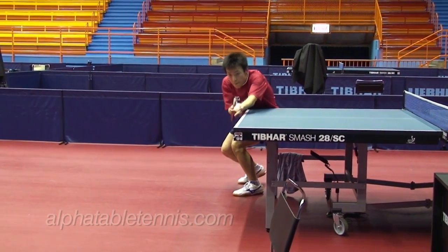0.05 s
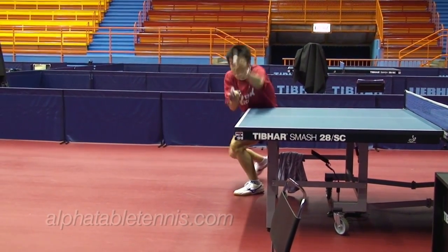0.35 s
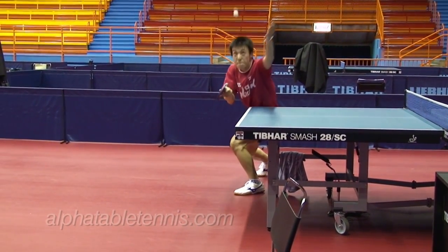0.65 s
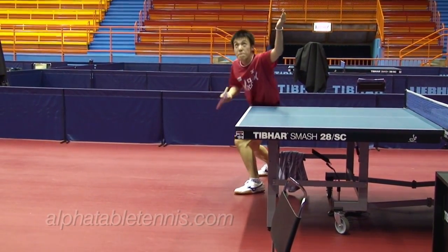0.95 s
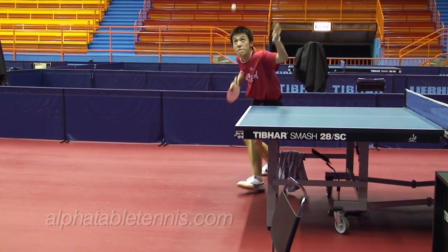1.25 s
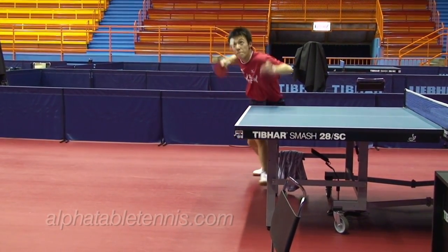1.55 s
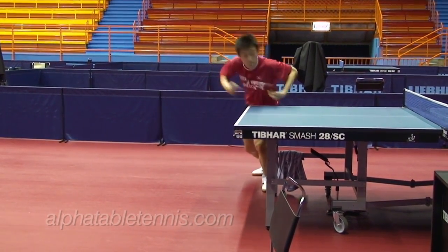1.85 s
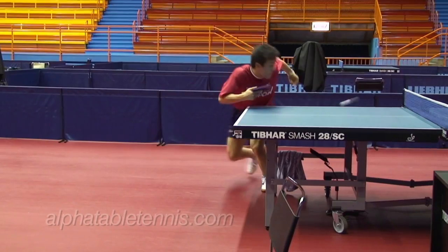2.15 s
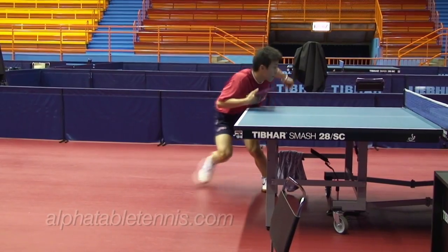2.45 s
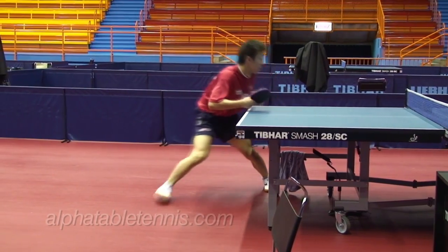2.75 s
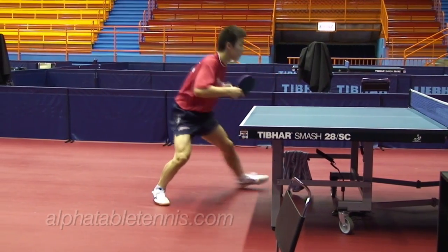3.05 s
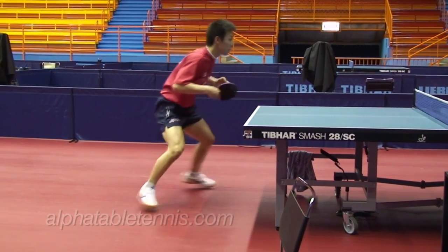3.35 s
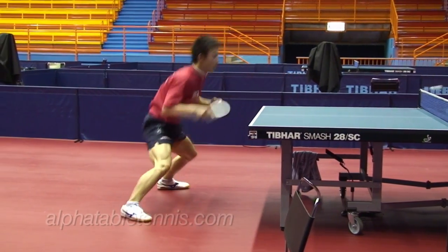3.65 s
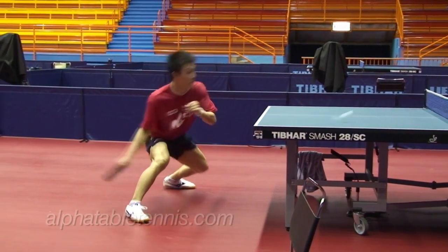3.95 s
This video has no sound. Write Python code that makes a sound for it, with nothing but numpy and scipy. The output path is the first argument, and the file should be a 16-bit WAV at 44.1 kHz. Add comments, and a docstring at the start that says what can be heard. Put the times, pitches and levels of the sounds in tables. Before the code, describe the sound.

A table tennis ball is played in a large echoing hall over a low ventilation rumble. Faint rustling and light taps come first. At 1.8 seconds the bat cracks sharply with a foot stomp, and the ball pings on the table, again at 2.2. A return cracks at 2.4, with further bounces and knocks near 2.9 and 3.3. Steps thud throughout, and a shoe squeaks around 3.7.

```python
"""A table tennis ball is served and returned in a large sports hall.
The bat cracks against it, its hollow shell pings at each bounce and the table top knocks.
The server stamps on the springy floor, clothes rustle and both players step and slide into place.
The hall echoes for seconds over the low rumble of the ventilation."""
import sys
import numpy as np
from scipy import signal
from scipy.fft import rfft, irfft
from scipy.io import wavfile
from scipy.ndimage import uniform_filter1d

SR = 44100
rng = np.random.default_rng(int(sys.argv[2]) if len(sys.argv) > 2 else 0)


def dump_mix(stems):
    """Bounce the given channels to the path in sys.argv[1] as a 16-bit WAV at rate SR."""
    frames = np.atleast_2d(stems).T  # one column per channel
    limited = np.clip(frames, -1, 1)  # hard clip at full scale
    pcm = np.round(limited * 32767).astype(np.int16)
    wavfile.write(sys.argv[1], SR, pcm)


N = 4 * SR


def amp(db):
    """Turns decibels into a number to multiply by."""
    return 10 ** (np.asarray(db) / 20)


def unit(x):
    """Scales a sound to an average strength (rms) of 1."""
    return x / np.sqrt(np.mean(x ** 2) + 1e-20)


def look_up(table, hz):
    """Reads between the rows of a frequency table, with octaves evenly spaced."""
    row_hz, values = np.transpose(table)
    return np.interp(np.log(hz + 1), np.log(row_hz + 1), values)


def add(mix, start_s, sound):
    """Mixes a sound in at the given time."""
    part = mix[max(round(start_s * SR), 0):][:len(sound)]
    part += sound[:len(part)]


def noise(colour, size):
    """Steady noise whose colour table says how strong each frequency is."""
    hz = np.fft.rfftfreq(size, 1 / SR)
    phases = np.exp(2j * np.pi * rng.random(len(hz)))
    return unit(irfft(amp(look_up(colour, hz)) * phases, size))


def snaps(size, per_s, spread_db, max_db):
    """Tiny clicks at random moments, most of them weak and a few strong."""
    strength = amp(np.minimum(spread_db * rng.exponential(1, size), max_db))
    happens = rng.random(size) < per_s / SR
    return strength * happens * rng.choice([-1, 1], size)


def ring(tones, rise_s):
    """A struck object's own tones swell, then each drops 60 dB over its ring time."""
    t = np.arange(SR // 2) / SR
    waves = sum(amp(db - 60 * t / ring_s) * np.sin(2 * np.pi * hz * t) for hz, db, ring_s in tones)
    return (1 - np.exp(-t / rise_s)) * waves


# How long the hall's echo takes to drop 60 dB (frequency [Hz], ring time [s])
HALL_RING_TIMES = [(50, 2.4), (200, 3.34), (600, 2.9), (1500, 4.85), (4000, 2.87), (8000, 0.23)]

def in_hall(direct, echo_db, gap_s=0.018, build_s=0.0041):
    """Adds the hall's wash of echoes, in which each frequency dies away at its own speed."""
    hz, t, bands = signal.stft(rng.standard_normal(SR * 5 // 2), SR, nperseg=512)
    fade = amp(-60 * t / look_up(HALL_RING_TIMES, hz)[:, None])
    tail = signal.istft(bands * fade, SR, nperseg=512)[1]
    since_gap = np.maximum(np.arange(len(tail)) / SR - gap_s, 0)
    tail *= (1 - np.exp(-since_gap / build_s)) / np.sqrt(SR / 6)
    return direct + amp(echo_db) * signal.fftconvolve(direct, tail)[:N]


# The colour of the moving air (frequency [Hz], relative level [dB])
AIR_COLOUR = [(20, -13.5), (45, -2), (62, 0.5), (85, -9), (105, -8.5), (160, -11), (230, -14), (325, -16),
              (480, -22.5), (1000, -30), (1500, -34), (2700, -41), (3400, -41), (3950, -38), (4300, -45.5),
              (4750, -43), (5600, -54.5), (7400, -55.5), (8200, -80.5), (9500, -100)]

def ventilation(level_db=-36):
    """The ventilation fills the hall with a steady rumble and a faint hiss."""
    return amp(level_db) * noise(AIR_COLOUR, N)


# How loudly shirt and shoes rustle as the ball is tossed (time [s], level [dB])
RUSTLE_LEVELS = [(.5, -70.5), (.62, -71.5), (.8, -74), (1.03, -57.5), (1.15, -54), (1.33, -52),
                 (1.45, -50.5), (1.639, -56), (1.802, -53)]
# The colour of that rustle (frequency [Hz], relative level [dB])
CLOTH_COLOUR = [(300, -16), (900, -2.5), (1850, 2), (2600, -6), (4200, -6.5), (7000, -32.5), (9000, -51.5)]

def rustle():
    """Cloth and rubber catch and let go many times a second, each time with a tiny puff of noise."""
    catches = snaps(N, per_s=1500, spread_db=2.5, max_db=10)
    puff = noise(CLOTH_COLOUR, 256) * np.hanning(256)
    puffs = unit(signal.oaconvolve(catches, puff)[:N])
    level_db = np.interp(np.arange(N) / SR, *np.transpose(RUSTLE_LEVELS), left=-100, right=-100)
    return in_hall(amp(level_db) * puffs, echo_db=-3.5)


# Soles sliding on the floor mat
# (middle time [s], half length [s], level [dB], centre frequency [Hz], width [octaves])
SOLE_SLIDES = [(0.15, 0.022, -62.5, 5200, 0.3), (0.898, 0.017, -54.5, 3270, 0.039),
               (1.251, 0.015, -52, 3900, 0.35), (1.507, 0.018, -44, 1770, .1),
               (1.631, 0.054, -48.5, 1810, .12), (1.993, .012, -48, 4780, 0.3),
               (2.3345, 0.0017, -32, 4050, 0.14), (2.339, 0.035, -55.5, 5336, 0.21),
               (3.087, 0.063, -45.5, 3995, 0.41), (3.617, 0.053, -53.5, 5610, 0.34),
               (3.668, .011, -24, 1000, .05), (3.71, .019, -26, 1015, .05), (3.917, 0.031, -50, 5320, 0.41),
               (3.936, 0.029, -39, 3310, 0.38)]

def slides(slip_s=0.006, slip_db=3.5, top_hz=7900):
    """Rubber brushes the mat, catching and slipping; a gripping sole narrows to a dull squeak."""
    out, t = np.zeros(N), np.arange(SR // 2) / SR
    hz = np.fft.rfftfreq(len(t), 1 / SR) + 1
    treble_cut = 1 / (1 + (hz / top_hz) ** 40)
    for middle_s, half_s, db, centre_hz, octaves in SOLE_SLIDES:
        slipping = unit(uniform_filter1d(rng.standard_normal(len(t)), round(slip_s * SR)))
        rough_hiss = amp(slip_db * slipping) * rng.standard_normal(len(t))
        colour = np.exp(-0.5 * (np.log2(hz / centre_hz) / octaves) ** 2) * treble_cut
        rub = unit(irfft(rfft(rough_hiss) * colour))
        lead_s = np.pi * half_s
        swell = np.exp(-0.5 * ((t - lead_s) / half_s) ** 2)
        add(out, middle_s - lead_s, amp(db) * rub * swell)
    return in_hall(out, echo_db=-6)


# The deep tones of the springy floor (pitch [Hz], relative level [dB], ring time [s])
FLOOR_TONES = [(36.2, -2.5, 0.31), (46.2, -3.5, 0.41), (60, -13, 0.59), (84.2, -2, 0.17),
               (118, -7.5, 0.088), (165, -8, 0.12)]
# The colour of rattling floor boards (frequency [Hz], relative level [dB])
BOARD_COLOUR = [(60, -18), (130, -4.5), (200, 0), (340, 1), (500, -3.5), (680, -4.5), (900, -11),
                (1400, -21), (2500, -32), (6000, -49), (9000, -80)]
# The colour of a sole's slap (frequency [Hz], relative level [dB])
SLAP_COLOUR = [(300, 3.5), (900, 13), (1400, 7.5), (2000, 4.5), (2900, -3.5), (4500, -4.5), (5600, -30),
               (7500, -23), (8700, -74.5)]
# Feet landing (time [s], thud [dB], rattle [dB], slap [dB], fade time of rattle and slap [s])
FOOTSTEPS = [(1.457, -15.5, -31, -37.5, 0.037), (1.599, -21, -53, -35.5, 0.021),
             (1.813, -8.5, -20.5, -26.5, 0.24), (1.844, -3, -31.5, -31.5, 0.11),
             (1.893, -8.5, -31, -28.5, 0.12), (2.058, -16, -35, -47, 0.027),
             (2.415, -23.5, -12, -32.5, 0.0084), (2.44, -17, -33.5, -36, 0.037),
             (2.575, -18, -31.5, -41.5, 0.011), (2.85, -21, -24, -37, 0.066),
             (2.886, -11, -23.5, -37.5, 0.055), (2.982, -13.5, -13, -25, 0.0091),
             (3.308, -24.5, -7.5, -22, 0.019), (3.353, -57, -12.5, -32, 0.026),
             (3.425, -37.5, -12, -53.5, 0.011), (3.714, -13.5, -19.5, -37, 0.061)]

def footsteps(rise_s=0.001):
    """Each foot sets the floor swinging, rattles its boards and slaps the mat in a run of tiny snaps."""
    thuds, rattles, slaps = np.zeros((3, N))
    t = np.arange(2 * SR) / SR
    thud = ring(FLOOR_TONES, rise_s=0.0048)
    slap_colour = amp(look_up(SLAP_COLOUR, np.fft.rfftfreq(len(t), 1 / SR)))
    for start_s, thud_db, rattle_db, slap_db, fade_s in FOOTSTEPS:
        fade = (1 - np.exp(-t / rise_s)) * np.exp(-t / fade_s)
        add(thuds, start_s, amp(thud_db) * thud)
        add(rattles, start_s, amp(rattle_db) * fade * noise(BOARD_COLOUR, len(t)))
        crackle = snaps(len(t), per_s=1800, spread_db=3, max_db=9)
        slap = unit(irfft(rfft(crackle) * slap_colour))
        add(slaps, start_s, amp(slap_db) * fade * slap)
    return in_hall(thuds, echo_db=-4.5) + in_hall(rattles, echo_db=2.5) + in_hall(slaps, echo_db=-5)


# The lasting tones of a knocked wooden panel (pitch [Hz], relative level [dB], ring time [s])
PANEL_TONES = [(632, -17.5, 0.28), (672, -19.5, .2)]
# Hollow knocks of the table top and floor boards (time [s], level [dB], pitch [Hz])
WOOD_KNOCKS = [(1.4602, -14.5, 262), (1.461, -24, 700), (1.8625, -5, 645), (1.9105, -8, 642),
               (1.9728, -8, 666), (2.1917, -10.5, 682), (2.884, -9, 164), (2.9115, -14, 587),
               (2.9825, -10.5, 655), (3.2563, -10.5, 475), (3.3072, -5, 660), (3.3135, -11.5, 331.4),
               (3.331, -5.5, 500), (3.3538, -8.5, 524), (3.3644, -5.5, 423), (3.429, -4.5, 336),
               (3.44, -11, 319), (3.455, -8, 340)]

def knocks(swell_s=0.0023, reach_hz=150):
    """Knocked wood swings only a few times; a knock near the panel's own pitch leaves it ringing."""
    out, t = np.zeros(N), np.arange(SR // 20) / SR
    swell = (t / swell_s * np.exp(1 - t / swell_s)) ** 2
    panel, panel_hz = ring(PANEL_TONES, swell_s), PANEL_TONES[0][0]
    for start_s, db, hz in WOOD_KNOCKS:
        add(out, start_s, amp(db) * swell * np.sin(2 * np.pi * hz * t))
        closeness = 1 / (1 + ((hz - panel_hz) / reach_hz) ** 2)
        add(out, start_s, amp(db) * closeness * panel)
    return in_hall(out, echo_db=-13.5)


# Sharp hits of bats and soles (time [s], peak level [dB], low edge [Hz], high edge [Hz])
SHARP_HITS = [(0.6143, -36.5, 1100, 1990), (1.0201, -30.5, 1500, 3400), (1.295, -32.5, 1780, 3520),
              (1.322, -33, 1500, 3200), (1.3398, -32, 1300, 3150), (1.4311, -23.5, 900, 2400),
              (1.439, -34.5, 1600, 2380), (1.4563, -33.5, 3430, 4870), (1.4583, -20, 600, 1900),
              (1.461, -25, 1220, 3000), (1.476, -22.5, 1490, 2060), (1.5, -24, 1500, 2400),
              (1.528, -27, 1500, 2120), (1.593, -31.5, 1410, 2370), (1.662, -32, 1400, 2200),
              (1.8119, -6.5, 700, 4330), (1.8123, -24, 6800, 8800), (1.8141, -5, 900, 1710),
              (1.834, -17, 3370, 5330), (1.843, -20.5, 3470, 5360), (1.845, -13.5, 1420, 2150),
              (1.852, -24, 2500, 4340), (1.8572, -12, 1400, 2400), (1.866, -32.5, 4000, 7300),
              (1.882, -21, 1800, 4180), (1.909, -22, 1700, 4200), (1.9162, -17, 1410, 2450),
              (1.928, -15, 1510, 2620), (1.9793, -22.5, 1780, 4550), (1.9847, -21, 1830, 4220),
              (2.064, -19.5, 1320, 2600), (2.415, -11, 600, 1250), (2.4152, -4.5, 900, 2100),
              (2.431, -14, 1500, 2680), (2.4455, -25.5, 1440, 2500), (2.457, -19.5, 1916, 2860),
              (2.8519, -16, 1295, 2600), (2.857, -19.5, 1508, 4820), (3.2556, -13, 1300, 5000),
              (3.291, -20.5, 1820, 5360), (3.3075, -6, 450, 1100), (3.3076, -24.5, 890, 6170),
              (3.684, -22, 1800, 4090), (3.701, -22.5, 1600, 3550), (3.713, -20, 1632, 2907)]

def cracks(scatter_s=0.0042):
    """Each hit is one sharp click with its own brightness, scattering briefly off nearby surfaces."""
    out, t = np.zeros(N), np.arange(SR // 10) / SR
    scatter_fade = amp(-17.5) / 2 * np.exp(-t / scatter_s)
    for start_s, db, low_hz, high_hz in SHARP_HITS:
        hit = scatter_fade * rng.standard_normal(len(t))
        hit[0] = 1  # the click itself
        bass_cut = signal.butter(2, low_hz, "high", fs=SR, output="sos")
        treble_cut = signal.butter(7, high_hz, fs=SR, output="sos")
        crack = signal.sosfilt(np.vstack([bass_cut, treble_cut]), hit)
        add(out, start_s, amp(db) * crack / abs(crack).max())
    return in_hall(out, echo_db=-10.5)


# The tones of the ball's hollow shell (pitch [Hz], relative level [dB], ring time [s])
SHELL_TONES = [(3600, -7, .015), (4425, 0, .029), (4945, -4, .027), (5580, -11, .016), (5890, -6, .016),
               (6500, -12, .02), (7110, -14, .017), (7720, -19, .013)]
# The ball's bounces (time [s], peak level [dB])
BALL_BOUNCES = [(1.835, -25), (2.192, -14), (2.9122, -18.5), (3.258, -34)]

def ball(rise_s=0.0011, echo_gap_s=0.0352):
    """The hollow shell pings at each bounce, and three quick, fading echoes repeat the ping."""
    out, ping = np.zeros(N), ring(SHELL_TONES, rise_s)
    t = np.arange(len(ping)) / SR
    ping *= 1 - np.exp(-2 * t / rise_s)  # softens the start further
    ping /= abs(ping).max()
    for start_s, db in BALL_BOUNCES:
        add(out, start_s, amp(db) * ping)
        for repeat, repeat_db in enumerate((-20, -28, -36), start=1):
            add(out, start_s + repeat * echo_gap_s, amp(db + repeat_db) * ping)
    return in_hall(out, echo_db=-16)


def scene():
    """All the sounds meet at one microphone."""
    return (ball() + cracks() + knocks() + footsteps() + slides() + rustle() + ventilation())[None]


def record(dry, low_hz=31.3, top_hz=9400, limit_from=0.85):
    """Cuts the deepest rumble, gently rounds off the tallest peaks and removes the highest treble."""
    x = signal.sosfilt(signal.butter(2, low_hz, "high", fs=SR, output="sos"), dry)
    headroom = 1 - limit_from
    rounded = limit_from + headroom * np.tanh((abs(x) - limit_from) / headroom)
    x = np.where(abs(x) < limit_from, x, np.sign(x) * rounded)
    treble_cut = signal.firwin(511, top_hz, window=("kaiser", 9), fs=SR)
    return signal.oaconvolve(x, treble_cut[None], "same")


dry = scene()
out = record(dry)
dump_mix(out)
```